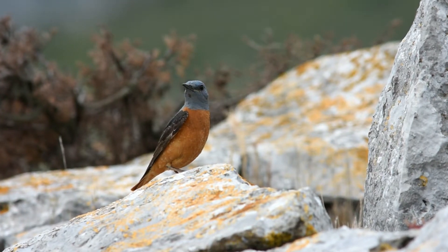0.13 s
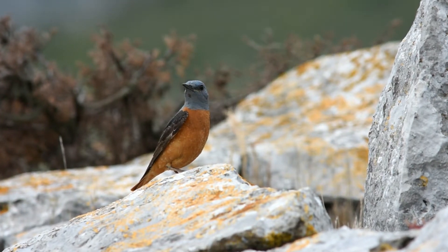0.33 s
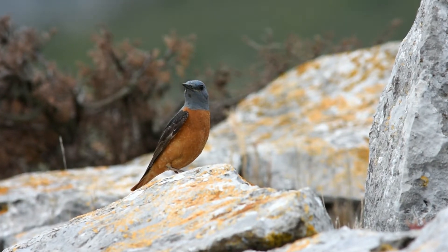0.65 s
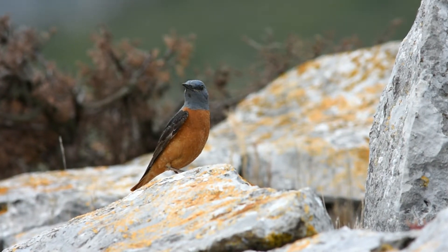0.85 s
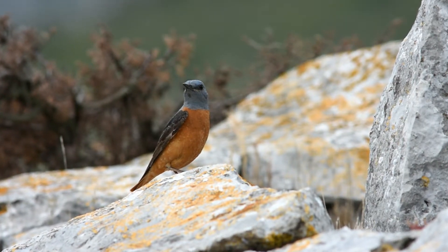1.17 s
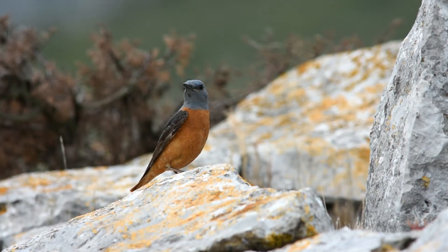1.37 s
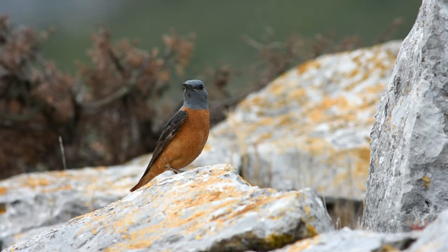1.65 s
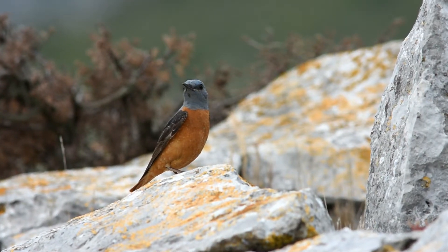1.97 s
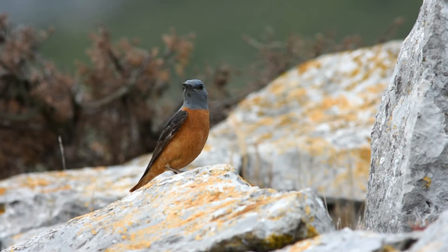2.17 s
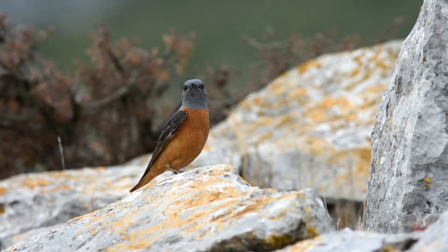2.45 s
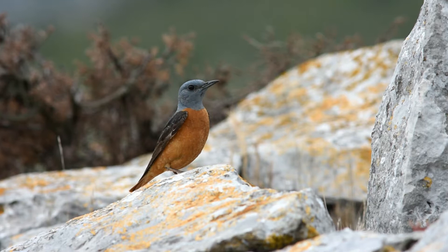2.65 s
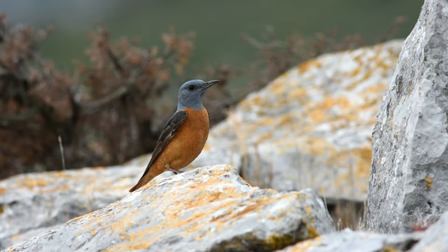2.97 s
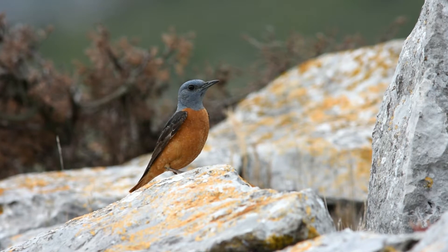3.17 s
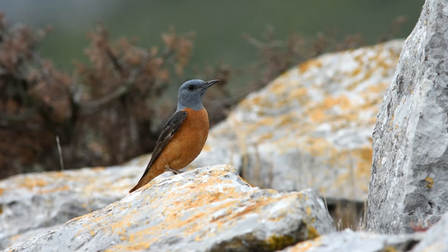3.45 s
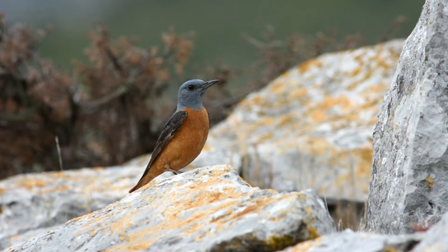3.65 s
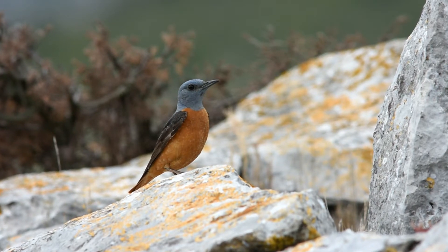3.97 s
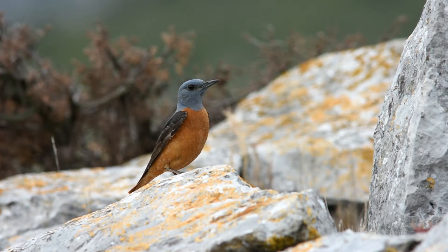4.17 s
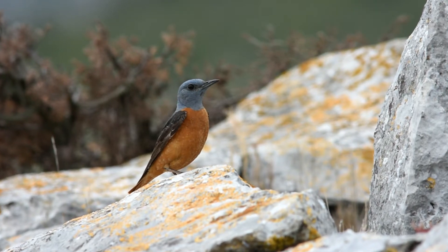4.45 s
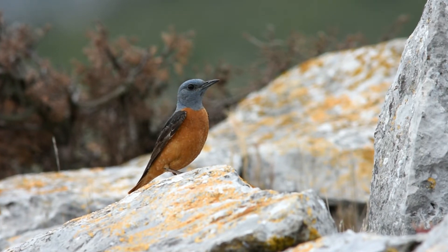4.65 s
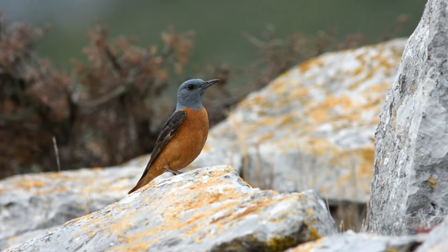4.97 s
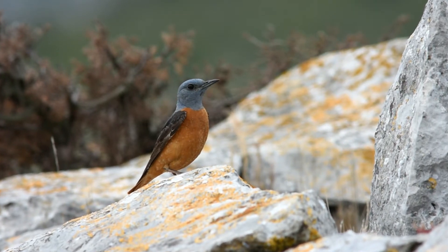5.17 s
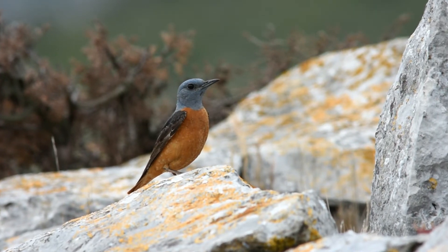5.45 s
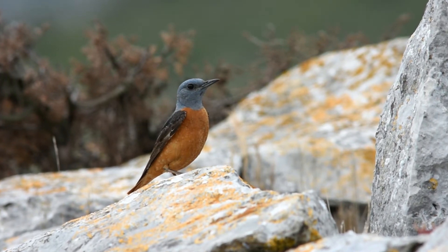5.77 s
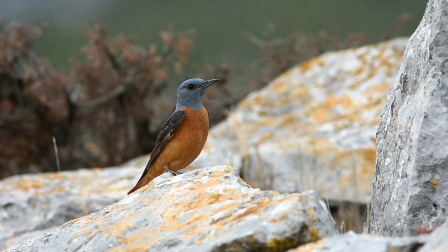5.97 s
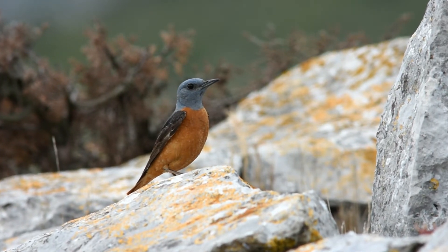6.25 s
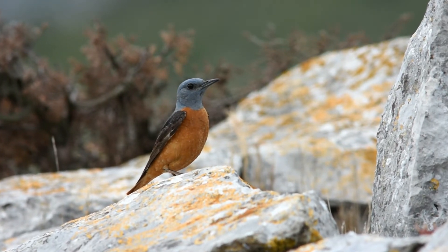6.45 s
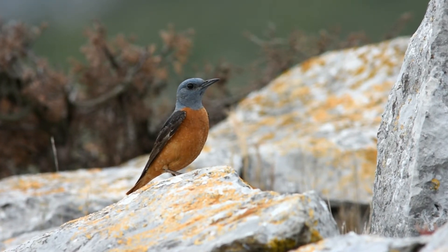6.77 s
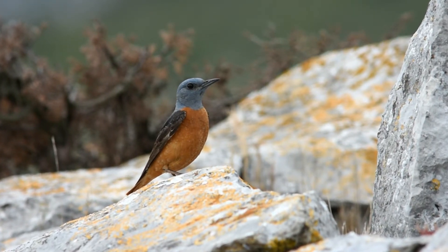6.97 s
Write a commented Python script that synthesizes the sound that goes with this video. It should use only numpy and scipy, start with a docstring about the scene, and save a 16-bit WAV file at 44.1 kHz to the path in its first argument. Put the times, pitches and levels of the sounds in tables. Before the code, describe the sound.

Soft outdoor hiss and a faint distant rumble open the scene, with a few small bumps near the microphone. A thrush then sings one fast, clear warble of sliding whistles and buzzy trills, ending on a longer quivering note. A short dry rustle comes close by midway through the song. Very faint insect pips and a low drone lie far behind, and only the quiet background remains at the end.

```python
"""A limestone outcrop on a quiet hillside, where a thrush sings one quick phrase.
The two sides of its syrinx whistle, glide, trill and now and then rasp. The song bounces off
the rocks nearby and sets narrow resonances ringing at the microphone. Close by come a few soft
taps, dull bumps and a dry rustle; far behind lie the hiss of the air, a low rumble,
a faint ringing, a swelling drone and the thin pips of an insect."""
import sys
import numpy as np
from scipy import signal
from scipy.fft import rfft, irfft
from scipy.io import wavfile
from scipy.ndimage import uniform_filter1d

SR = 44100
rng = np.random.default_rng(int(sys.argv[2]) if len(sys.argv) > 2 else 0)


def waveform_to_disk(signal):
    """Save audio, clipped to [-1, 1], as 16-bit WAV at the path in sys.argv[1]."""
    frames = np.transpose(np.atleast_2d(signal))
    scaled = np.clip(frames, -1, 1) * 32767
    samples = np.round(scaled).astype(np.int16)
    wavfile.write(sys.argv[1], SR, samples)


N = 313900
TIME = np.arange(N) / SR
FREQS = np.maximum(np.fft.rfftfreq(N, 1 / SR), 1)


def from_db(db):
    """Decibels to gain."""
    return 10 ** (np.asarray(db) / 20)


def unit_rms(x):
    """Scale to an rms of 1."""
    return x / np.sqrt(np.mean(x ** 2) + 1e-20)


def at_hz(points, hz):
    """Read a curve on a log-frequency axis."""
    point_hz, values = np.transpose(points)
    return np.interp(np.log(hz), np.log(point_hz), values)


def drift(rate_hz):
    """A smooth random wander, mostly slower than `rate_hz`; rms 1."""
    return unit_rms(irfft(rfft(rng.standard_normal(N)) / (1 + (FREQS / rate_hz) ** 2), N))


def resonate(x, hz, width_hz):
    """One resonance with a gain of 1 at its peak."""
    r = np.exp(-np.pi * width_hz / SR)
    feedback = [1, -2 * r * np.cos(2 * np.pi * hz / SR), r * r]
    return signal.lfilter(np.array([1, 0, -1]) * (1 - r * r) / 2, feedback, x + 1e-18)


# The stereo image at the microphone. Each row: frequency in Hz, left-right likeness from 0 to 1.
STEREO_LIKENESS = [(60, 1.0), (130, 1.0), (290, 1), (640, 0.82), (1410, 0.48), (3100, 0.076), (6820, 0.077),
                   (15000, 0.01)]

def stereo_noise(spectrum):
    """Coloured noise, alike on both channels in the bass and apart in the treble; rms 1."""
    mid, side = rfft(rng.standard_normal((2, N)))
    alike = np.clip(at_hz(STEREO_LIKENESS, FREQS), 0, 1)
    channels = np.sqrt(1 + alike) * mid + np.sqrt(1 - alike) * side * [[1], [-1]]
    return unit_rms(irfft(channels * from_db(at_hz(spectrum, FREQS)), N))


# Still air all around the microphone. Each row: frequency in Hz, relative level in dB.
AIR_COLOUR = [(150, -42), (250, -4), (353, -4), (442, -7), (583, -7.5), (913, -10), (1270, -9.5),
              (1380, -6), (1510, -10), (1920, -10.5), (5040, -13.5), (5410, -14), (15500, -24)]

def still_air(level_db=-54.5):
    """A soft, even hiss."""
    return from_db(level_db) * stereo_noise(AIR_COLOUR)


def narrow_noise(hz, width_hz):
    """Hiss narrowed to a rough note by two passes through a resonance; rms 1."""
    once = resonate(stereo_noise(AIR_COLOUR), hz, width_hz)
    return unit_rms(resonate(once, hz, width_hz))


# The low end, from far off. Each row: frequency in Hz, relative level in dB.
RUMBLE_COLOUR = [(11, -33), (18, -15), (54, -2), (76, 2), (134, -9.5), (198, -14), (230, -17), (280, -31),
                 (360, -46), (620, -120)]

def rumble(start_db=-47.5, rise_db_per_s=0.3845, waver_db=1.5):
    """Deep noise that wavers and slowly grows."""
    return from_db(start_db + rise_db_per_s * TIME + waver_db * drift(2)) * stereo_noise(RUMBLE_COLOUR)


# Faint ringing in the distance. Each row: pitch in Hz, resonance width in Hz, level in dB.
RINGING_BANDS = [(1084, 60, -71), (1375, 130, -68.5), (1645, 88, -70)]

def far_ringing(waver_db=2):
    """Narrow bands of noise, each wavering in level on its own."""
    return sum(from_db(db + waver_db * drift(2.3)) * narrow_noise(hz, width_hz)
               for hz, width_hz, db in RINGING_BANDS)


# A drone a long way off, centred between the channels.
# Each row: centre of a swell in seconds, half length in seconds, pitch in Hz, level in dB.
FAR_SWELLS = [(.67, 0.28, 191, -56.5), (1.395, 0.29, 186.8, -60.5), (3.505, 0.56, 190.4, -63.5),
              (5.245, 0.18, 200.2, -56.5)]

def far_drone(rest_db=-67, waver_db=1.0, waver_hz=5):
    """A low wavering tone that swells and sinks back, its pitch creeping from swell to swell."""
    swell = from_db(rest_db) + sum(from_db(db) * np.exp(-((TIME - centre) / half_length) ** 2)
                                   for centre, half_length, _, db in FAR_SWELLS)
    centres, _, hz, _ = np.transpose(FAR_SWELLS)
    pitch = np.interp(TIME, centres, hz) + waver_hz * drift(13.45)
    tone = np.sqrt(2) * np.sin(2 * np.pi * np.cumsum(pitch) / SR)
    return swell * from_db(waver_db * drift(3.0)) * tone


def insect(pips_per_s=5.2, pitch_hz=5470, level_db=-65, fade_from_s=3.0, fade_db_per_s=2.5):
    """A thin far note in short, uneven pips that hold for a while, then fade away."""
    chirr = narrow_noise(pitch_hz, width_hz=120)
    turns = pips_per_s * (TIME - .08) + 0.13 * drift(2)
    pips = np.maximum(np.cos(2 * np.pi * turns), 0)
    fade_db = fade_db_per_s * np.maximum(TIME - fade_from_s, 0)
    return from_db(level_db - fade_db + 2 * drift(5.8)) * pips * chirr


def scuffs(events, colour, rise_s, grain_db=3):
    """Short grainy bursts of noise close to the microphone, nearly the same on both channels."""
    envelope = np.zeros(N)
    for start, db, fade_s in events:
        age = np.maximum(TIME - start, 0)
        envelope += from_db(db) * (1 - np.exp(-age / rise_s)) * np.exp(-age / fade_s)
    noise = stereo_noise(colour)
    centred = unit_rms(noise + 0.58 * noise[::-1])
    return envelope * from_db(grain_db * drift(300)) * centred


# Taps close to the microphone. Each row: start in seconds, level in dB, fading time in seconds.
CLOSE_TAPS = [(0.233, -42.5, 0.0086), (1.515, -35, 0.006), (2.023, -46, 0.0085), (3.782, -46, 0.0067),
              (4.39, -37.5, 0.0078)]
# Their hollow tone. Each row: frequency in Hz, relative level in dB.
HOLLOW_COLOUR = [(300, -29), (550, -22), (720, 5.5), (870, -2), (1050, 9.5), (1400, -8), (1750, 6.5),
                 (2400, -19), (8000, -29)]

def taps():
    """Single soft taps, made hollow by a few peaks in the midrange."""
    return scuffs(CLOSE_TAPS, HOLLOW_COLOUR, rise_s=0.0021)


# Dull bumps, dead centre. Each row: start in seconds, relative level in dB, pitch in Hz.
DULL_BUMPS = [(0.281, -38, 358), (0.417, -45.5, 316), (0.497, -43.5, 356), (1.04, -49, 338),
              (3.783, -38.5, 346)]

def bumps(gain_db=-3, fade_s=0.0034):
    """Soft knocks that die within a few cycles."""
    knocks = np.zeros(N)
    for start, db, hz in DULL_BUMPS:
        age = np.maximum(TIME - start, 0)
        envelope = age / fade_s * np.exp(1 - age / fade_s)
        knocks += from_db(db) * envelope * np.sin(2 * np.pi * hz * age)
    return from_db(gain_db) * knocks


def arc(opening, middle, closing, progress):
    """A glide from opening to closing, bowed to pass through the middle value."""
    bow = middle - (opening + closing) / 2
    return opening + (closing - opening) * progress + bow * (1 - (2 * progress - 1) ** 2)


def gestures(notes, attack_s=0.014, release_s=0.016, mid_swell_db=0.5):
    """Pitch and air flow of one voice: each note opens, glides and closes; overlaps are slurred."""
    pitch, flow, sounding = np.zeros((3, N))
    for start, length, opening_hz, middle_hz, closing_hz, opening_db, closing_db in notes:
        on = (TIME > start) & (TIME < start + length)
        age = TIME[on] - start
        gate = np.minimum(age / attack_s, 1) * np.minimum((length - age) / release_s, 1)
        gate = np.sin(np.pi / 2 * gate) ** 2   # rounded corners
        middle_db = (opening_db + closing_db) / 2 + mid_swell_db
        pitch[on] += gate * arc(opening_hz, middle_hz, closing_hz, age / length)
        flow[on] += gate * from_db(arc(opening_db, middle_db, closing_db, age / length))
        sounding[on] += gate
    on = sounding > 0
    return np.interp(TIME, TIME[on], pitch[on] / sounding[on]), flow


# The bird's throat lets the octave through mostly on the lowest notes.
# Each row: sung pitch in Hz, relative level of its octave in dB.
THROAT_OCTAVE = [(1500, -1), (1680, -4), (2050, -27), (2350, -34), (2580, -28), (2800, -36), (3200, -29),
                 (3600, -35), (4300, -31)]

def whistle(notes, bend_hz, pulse, jitter=0.004, shimmer_db=1.78, octave_lift_db=1.0):
    """One side of the syrinx: a slightly unsteady tone and its octave."""
    centre, flow = gestures(notes)
    pitch = centre * np.exp(bend_hz / centre)   # bends reach further up than down
    pitch *= 1 + jitter * drift(250)
    phase = 2 * np.pi * np.cumsum(pitch) / SR
    octave_gain = from_db(at_hz(THROAT_OCTAVE, pitch) + octave_lift_db)
    tone = np.sin(phase) + octave_gain * np.sin(2 * phase)
    return np.sqrt(2) * flow * pulse * from_db(shimmer_db * drift(100)) * tone


# The phrase as it leaves the bird on the outcrop. Each row: start and length in seconds,
# opening, middle and closing pitch in Hz, opening and closing level in dB.
LEAD_NOTES = [(1.35, 0.058, 1714, 1925, 2020, -58, -48), (1.408, 0.046, 2450, 1870, 1670, -47, -58),
              (1.55, 0.044, 2950, 2690, 2506, -58.5, -28), (1.611, 0.047, 2840, 2204, 2006, -31, -47),
              (1.712, 0.11, 1885, 2088, 2080, -47, -31.5), (1.81, 0.13, 2100, 2213, 2375, -43.5, -40),
              (2.005, 0.029, 2450, 2553, 2650, -41, -44), (2.023, 0.092, 2435, 3100, 2915, -29.5, -46.5),
              (2.106, .034, 2980, 2664, 2300, -36, -35), (2.141, .046, 3660, 3210, 3020, -30.5, -43),
              (2.173, .055, 3080, 2990, 2452, -39, -38.5), (2.228, 0.088, 3700, 3200, 3080, -33.5, -38),
              (2.355, 0.11, 2650, 2629, 2830, -33, -25.5), (2.446, 0.077, 2610, 2860, 2740, -30.5, -40),
              (2.54, 0.036, 2400, 2847, 2650, -36.5, -37), (2.565, .047, 2820, 2110, 1800, -14.5, -55),
              (2.6, 0.065, 1724, 1976, 1940, -38.5, -39), (2.698, .087, 3280, 4106, 4000, -38, -22),
              (2.771, 0.07, 4280, 3600, 3140, -27.5, -33.5), (2.911, 0.18, 2344, 2234, 2420, -40.5, -39),
              (3.172, 0.025, 2730, 2714, 2640, -44, -35), (3.187, 0.049, 2630, 2462, 2544, -31, -33),
              (3.3, 0.15, 2064, 2122, 2076, -38, -38), (3.491, 0.05, 2195, 2740, 3020, -44.5, -39),
              (3.541, 0.031, 3050, 2780, 2220, -42, -31), (3.613, 0.064, 3900, 3354, 2664, -44.5, -36.5),
              (3.729, 0.057, 2270, 2352, 2660, -51, -21.5), (3.776, 0.04, 2520, 2742, 2815, -27.5, -35.5),
              (3.936, .066, 3090, 2763, 2546, -41.5, -25.5), (3.987, .076, 2603, 2492, 2350, -36, -36.5),
              (4.095, .1, 3520, 3297, 3170, -38.5, -32.5), (4.18, .138, 3210, 3117, 3456, -34, -38.5),
              (4.368, 0.096, 1985, 2188, 2058, -44, -38), (4.546, 0.067, 1770, 1557, 1470, -46.5, -59),
              (4.609, 0.045, 1470, 2260, 2730, -47.5, -24.5), (4.641, 0.08, 2493, 3210, 3590, -35.5, -44),
              (4.708, 0.094, 3460, 3535, 3220, -31, -41.5), (4.853, 0.036, 2690, 2890, 2980, -40, -54),
              (4.876, .025, 2790, 2555, 2380, -36, -34.5), (4.901, 0.053, 2395, 2870, 2340, -39.5, -35),
              (4.957, 0.045, 2520, 2878, 2420, -42, -34.5), (5.058, 0.13, 2907, 2610, 2617, -46, -37.5),
              (5.176, 0.27, 2566, 2546, 2452, -39, -40.5)]
# The other side of the syrinx joins in briefly. Each row reads as above.
SECOND_NOTES = [(1.83, 0.11, 1990, 1684, 1736, -47.5, -51.5), (2.145, 0.034, 2510, 2685, 2830, -32, -43.5),
                (2.69, 0.049, 2807, 2710, 2660, -45.5, -65), (3.616, 0.045, 4400, 3950, 3603, -37.5, -46),
                (3.872, 0.0358, 3940, 3880, 3470, -29.5, -33), (3.912, 0.031, 3720, 3808, 3650, -35, -29),
                (4.73, .068, 4580, 4420, 3920, -57.5, -55)]

def thrush():
    """Both sides of the syrinx; the second pulses more gently and takes no pitch swing from the trills."""
    swing_hz, pulse = trills()
    scatter_hz, hiss = rasps()
    lead = whistle(LEAD_NOTES, swing_hz + scatter_hz, pulse)
    second = whistle(SECOND_NOTES, scatter_hz, np.sqrt(pulse))
    return lead + second + hiss


# Rock faces close by. Each row: echo delay in seconds, left level in dB, right level in dB.
ROCK_FACES = [(.0048, -28, -13.5), (.0087, -6.5, -14), (0.013, -47.5, -26.5), (0.022, -24, -23)]

def hillside(song, scatter_db=-17, scatter_t60_s=0.17, tail_db=-34, tail_t60_s=1.0):
    """Direct sound, a few rock echoes, then scatter from stones and scrub."""
    t = TIME[:SR // 2]
    paths = np.zeros((2, len(t)))
    paths[:, 0] = 1
    for delay, left_db, right_db in ROCK_FACES:
        paths[:, round(delay * SR)] += from_db([left_db, right_db])
    for level_db, t60 in ((scatter_db, scatter_t60_s), (tail_db, tail_t60_s)):
        decay = np.exp(-np.log(1000) * t / t60) * (t > .002)
        scatter = unit_rms(rng.standard_normal(paths.shape) * decay)
        paths += from_db(level_db) * scatter / np.sqrt(len(t))
    return signal.fftconvolve(song[None], paths, axes=1)[:, :N]


# Narrow resonances right at the microphone. Each row: frequency in Hz, width in Hz, gain in dB.
MIC_RESONANCES = [(2386, 210, 1.5), (2595, 48.6, 13.5), (2765, 28, 6.5)]

def ring_at_microphone(song, gain_db=-1.5, pan_right_db=1.0):
    """Notes flare up and ring as they glide through the resonances."""
    ringing = sum(from_db(db) * resonate(song, hz, width_hz) for hz, width_hz, db in MIC_RESONANCES)
    panned = song * from_db([[-pan_right_db], [pan_right_db]])
    return from_db(gain_db) * (panned + ringing)


# Trills in the phrase; a fast buzz may ride on a slow swing. Each row: start and end in seconds,
# cycles per second, rough pitch swing in Hz, pulsing depth in dB, loudest point of the cycle in turns.
SONG_TRILLS = [(1.608, 1.655, 125, 90, 4, .6), (1.8135, 1.93, 52.6, 260, 9, .5),
               (2.005, 2.032, 140, 260, 3, .5), (2.055, 2.32, 165, 85, 2, .5),
               (2.3338, 2.449, 34.5, 185, 1.5, .3), (2.578, 2.615, 150, 110, 3, .5),
               (2.695, 2.785, 108, 190, 4.5, .5), (2.785, 2.85, 118, 70, 3, .5),
               (2.9135, 2.936, 88, 300, 9, .5), (2.9357, 3.085, 53.8, 370, 10, .5),
               (3.2825, 3.45, 43.9, 110, 4, .3), (3.6118, 3.678, 78, 520, 3, .5),
               (4.0613, 4.32, 22.9, 610, 1.5, .4), (4.12, 4.31, 210, 115, 2.5, .5),
               (4.88, 4.895, 190, 280, 4, .5), (4.915, 4.95, 185, 280, 4, .5),
               (4.974, 5.01, 190, 280, 4, .5), (5.1134, 5.289, 68.3, 95, 3.3, .5),
               (5.289, 5.455, 75, 100, 4.2, .5)]

def trills(smooth_samples=50):
    """The syrinx muscles swing the pitch and pulse the air flow in step: (offset in Hz, gain)."""
    swing, pulse_db = np.zeros((2, N))
    for start, end, rate, swing_hz, depth_db, loudest in SONG_TRILLS:
        on = (TIME >= start) & (TIME < end)
        turns = rate * (TIME[on] - start)
        swing[on] += swing_hz * np.sin(np.sin(2 * np.pi * turns) * 1.25)   # lingers at each extreme
        pulse_db[on] += depth_db * (np.cos(2 * np.pi * (turns - loudest)) - .6)
    return uniform_filter1d(swing, smooth_samples), from_db(uniform_filter1d(pulse_db, smooth_samples))


# Harsh moments in the phrase.
# Each row: centre and half length in seconds, pitch scatter in Hz, hiss level in dB.
SONG_RASPS = [(2.023, 0.015, 248, -41.5), (2.133, 0.021, 220, -42), (2.224, 0.026, 80, -48.5),
              (2.374, 0.036, 30, -56.5), (2.562, 0.015, 40, -53), (3.638, 0.026, 300, -49),
              (3.928, 0.031, 49.8, -49.5), (4.228, 0.085, 89.7, -54.5)]
# Their hiss, at the bird. Each row: frequency in Hz, relative level in dB.
HISS_COLOUR = [(600, -39), (1500, -23), (2600, 5), (3800, 8.5), (4700, 0.5), (6000, -8), (8000, -30),
               (14000, -37)]

def rasps(chaos_hz=700, grain_db=3):
    """The membranes vibrate chaotically, scattering the pitch and shedding hiss: (offset in Hz, hiss)."""
    scatter, envelope = np.zeros((2, N))
    for centre, half_length, scatter_hz, hiss_db in SONG_RASPS:
        harshness = np.exp(-((TIME - centre) / half_length) ** 2)
        scatter += scatter_hz * harshness
        envelope += from_db(hiss_db) * harshness
    scatter *= drift(chaos_hz)
    hiss = envelope * from_db(grain_db * drift(190)) * stereo_noise(HISS_COLOUR)[0]
    return scatter, hiss


# A rustle close to the microphone.
# Each row: start in seconds, relative level in dB, fading time in seconds.
CLOSE_RUSTLE = [(3.154, -29.5, 0.0093), (3.178, -36, 0.015), (3.196, -30.5, 0.01), (3.226, -30, 0.015),
                (3.268, -42, 0.019)]
# Its dry tone. Each row: frequency in Hz, relative level in dB.
DRY_COLOUR = [(300, -22), (500, -21), (650, 6), (830, -6.5), (1100, 6), (1800, 1), (2600, -1), (4000, -6.5),
              (6500, -16), (12000, -37)]

def rustle(gain_db=-4.0):
    """A quick run of dry scuffs, midway through the song."""
    return from_db(gain_db) * scuffs(CLOSE_RUSTLE, DRY_COLOUR, rise_s=0.0019)


def scene():
    """Small sounds close by, the bird among its rocks and the quiet distance behind."""
    close = rustle() + taps() + bumps()
    bird = ring_at_microphone(hillside(thrush()))
    distance = insect() + still_air() + rumble() + far_ringing() + far_drone()
    return close + bird + distance


def record(dry, cutoff_hz=15600):
    """The highest treble is cut steeply."""
    return irfft(rfft(dry) / (1 + (FREQS / cutoff_hz) ** 300), N)


dry = scene()
out = record(dry)
waveform_to_disk(out)
```